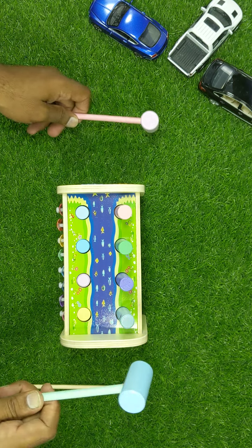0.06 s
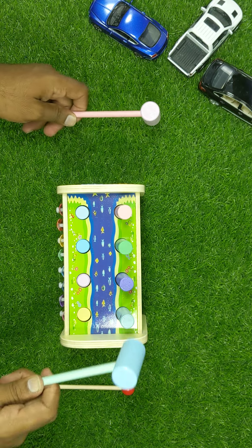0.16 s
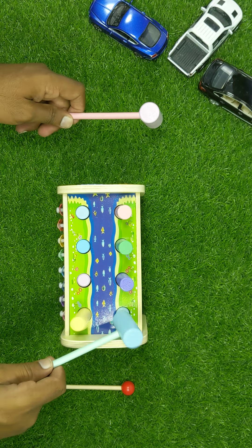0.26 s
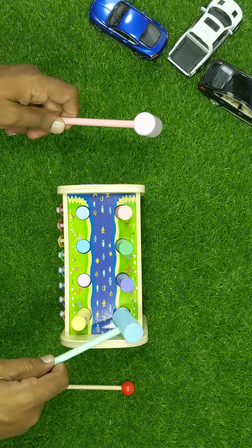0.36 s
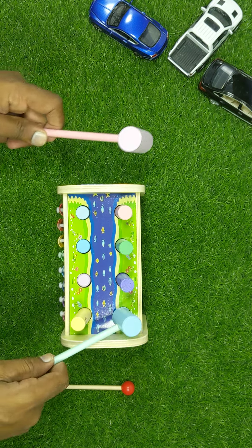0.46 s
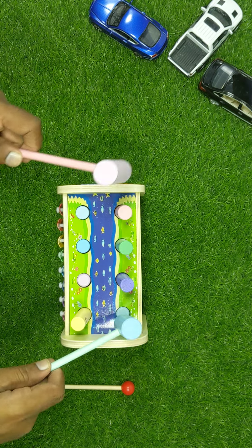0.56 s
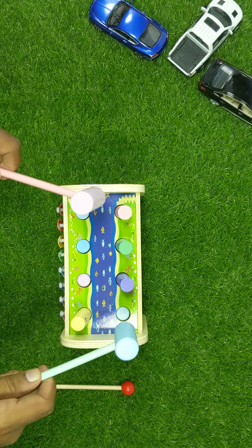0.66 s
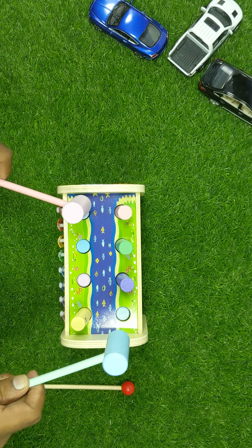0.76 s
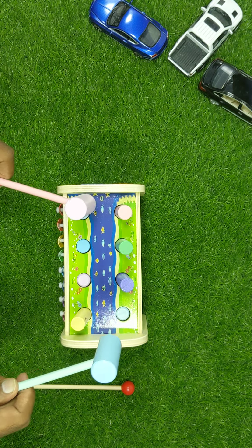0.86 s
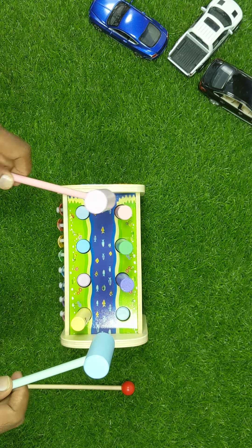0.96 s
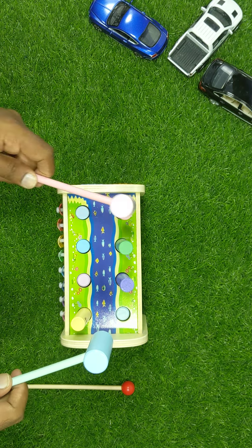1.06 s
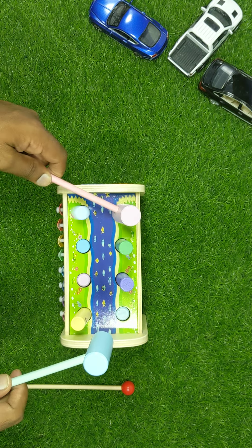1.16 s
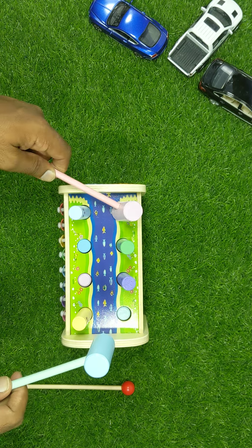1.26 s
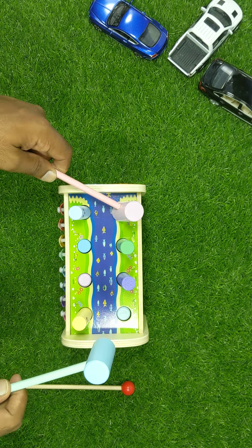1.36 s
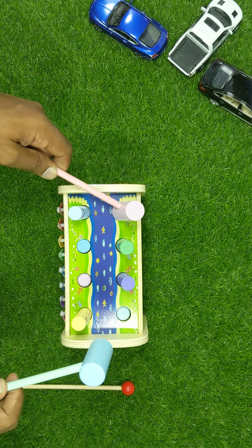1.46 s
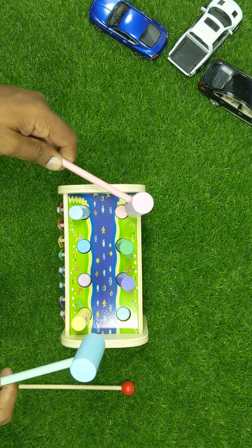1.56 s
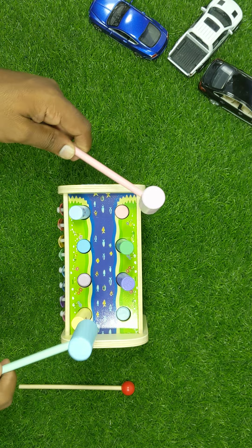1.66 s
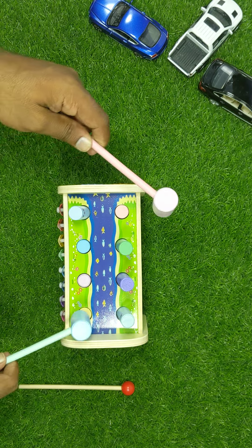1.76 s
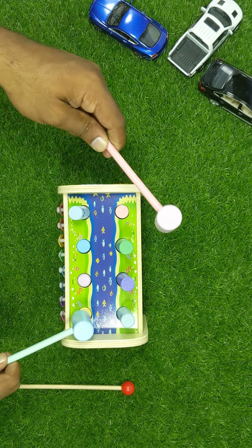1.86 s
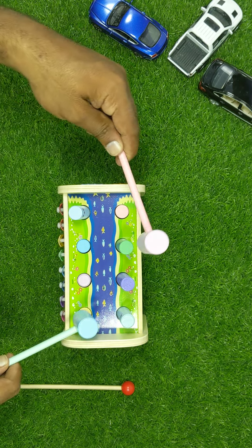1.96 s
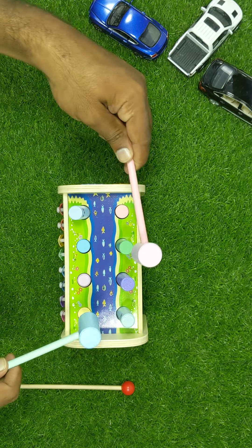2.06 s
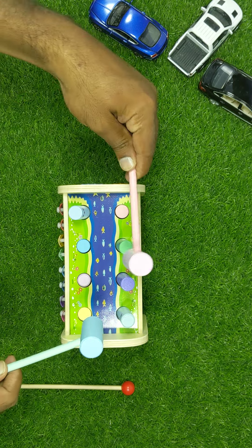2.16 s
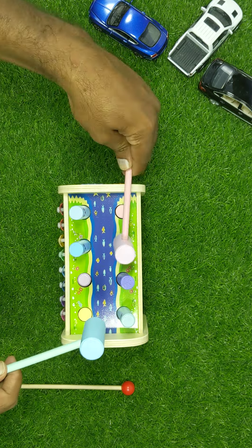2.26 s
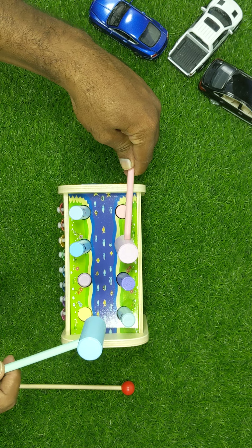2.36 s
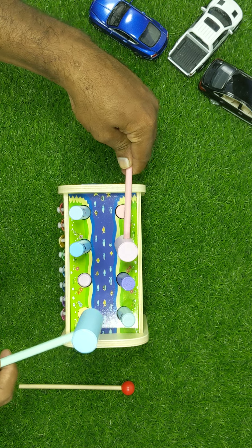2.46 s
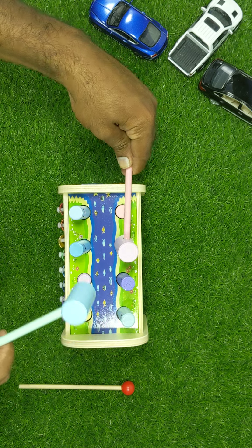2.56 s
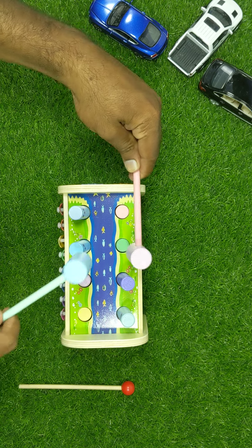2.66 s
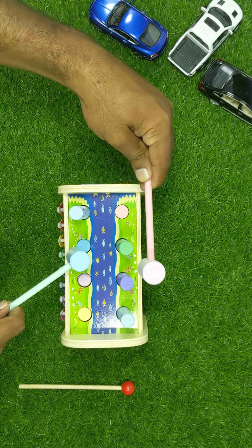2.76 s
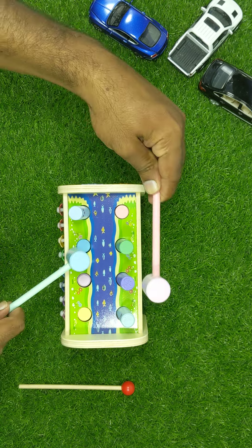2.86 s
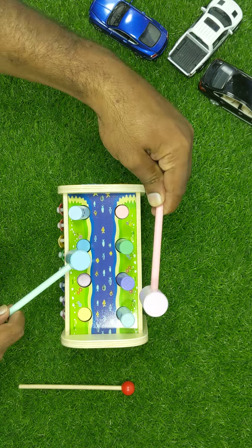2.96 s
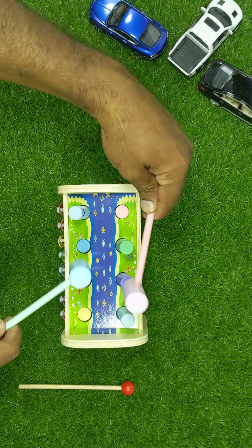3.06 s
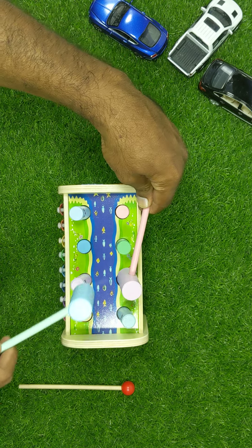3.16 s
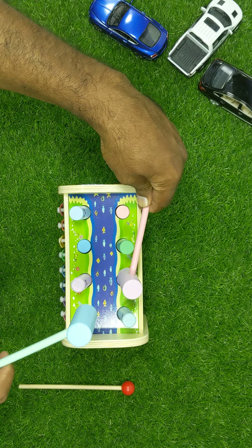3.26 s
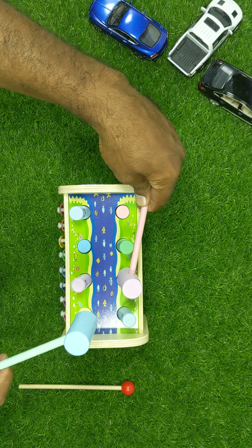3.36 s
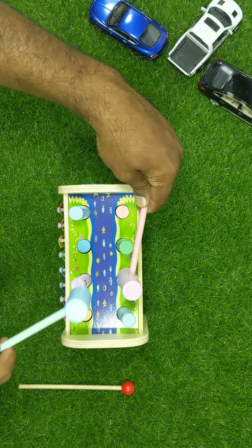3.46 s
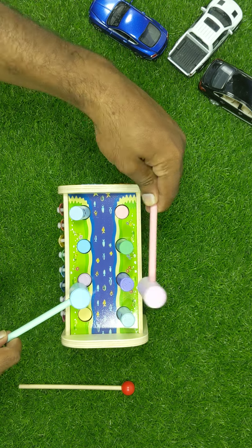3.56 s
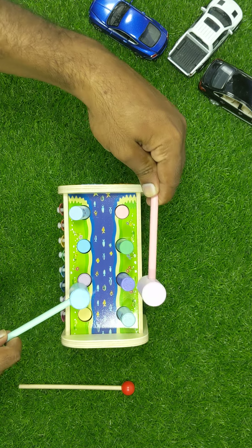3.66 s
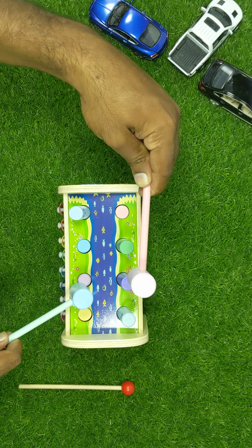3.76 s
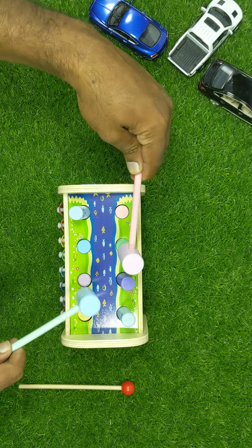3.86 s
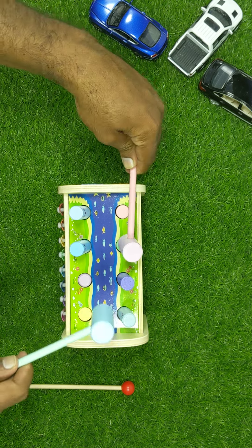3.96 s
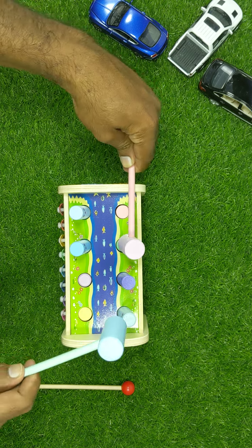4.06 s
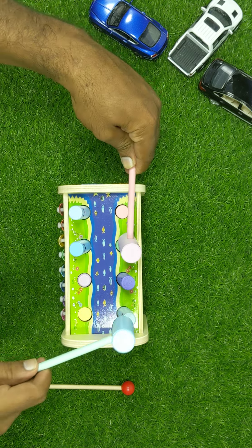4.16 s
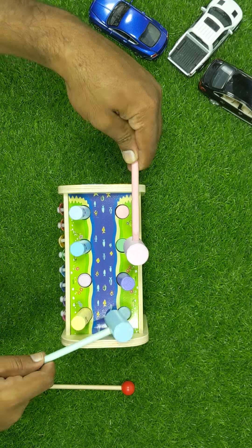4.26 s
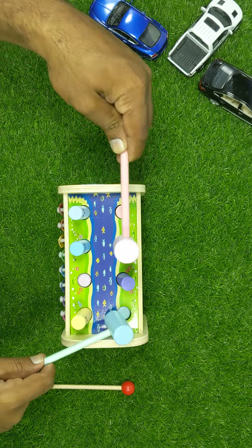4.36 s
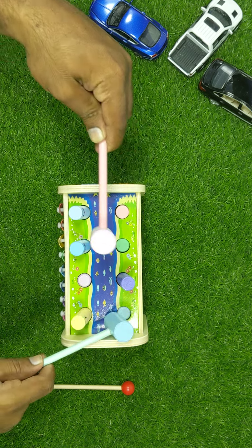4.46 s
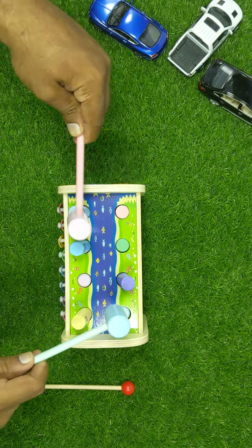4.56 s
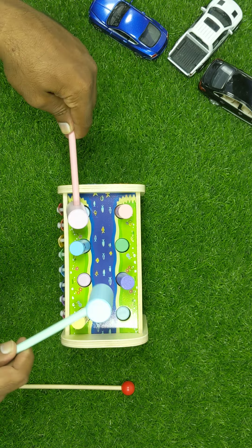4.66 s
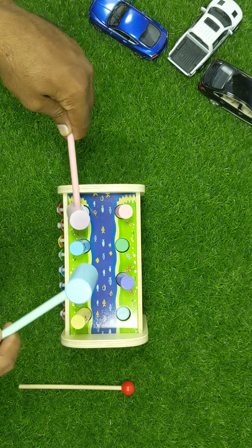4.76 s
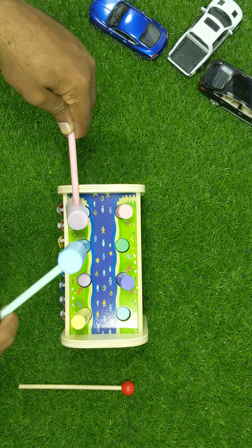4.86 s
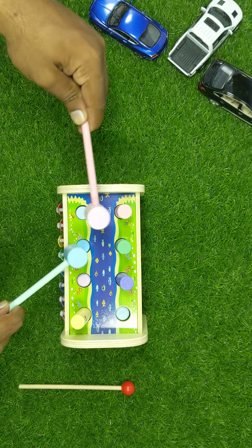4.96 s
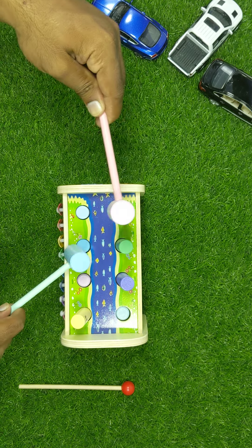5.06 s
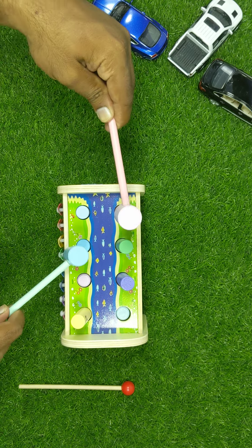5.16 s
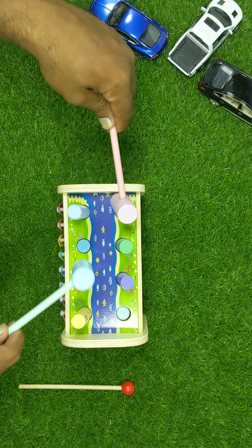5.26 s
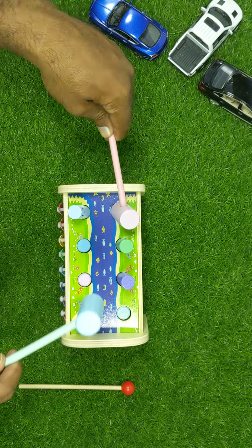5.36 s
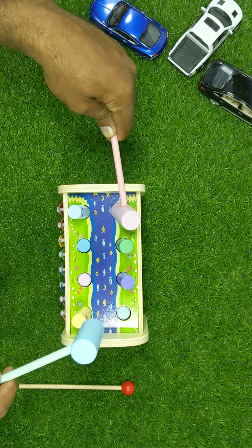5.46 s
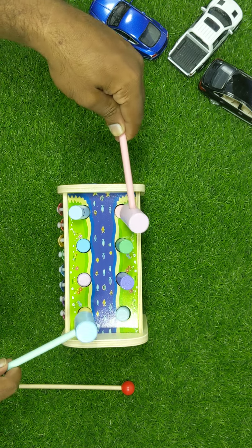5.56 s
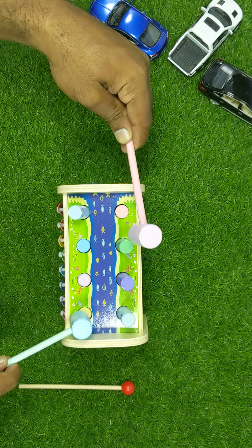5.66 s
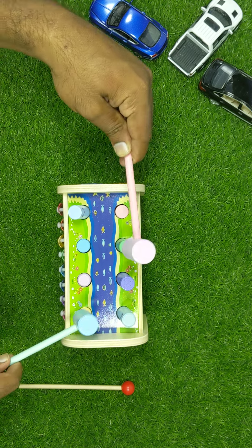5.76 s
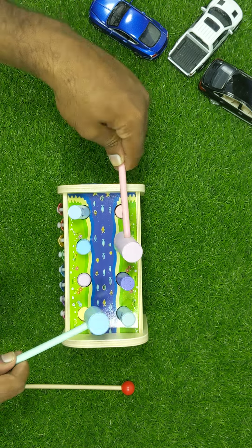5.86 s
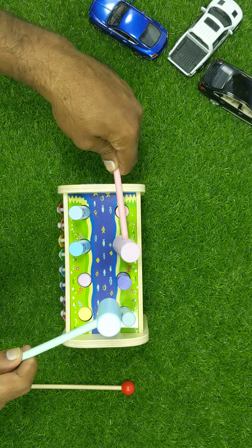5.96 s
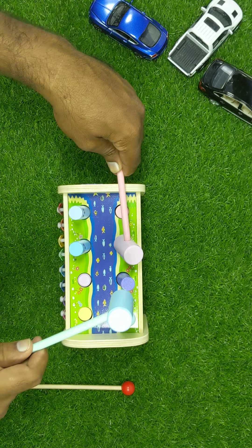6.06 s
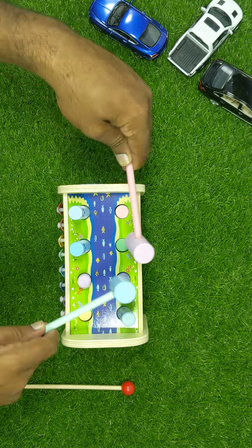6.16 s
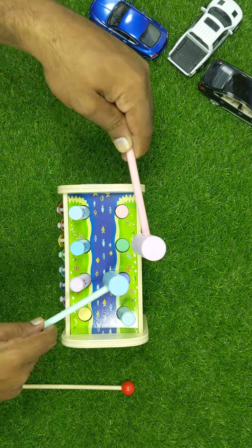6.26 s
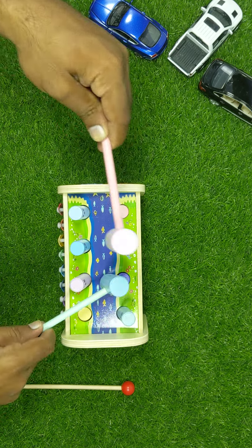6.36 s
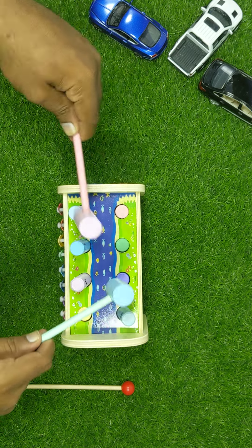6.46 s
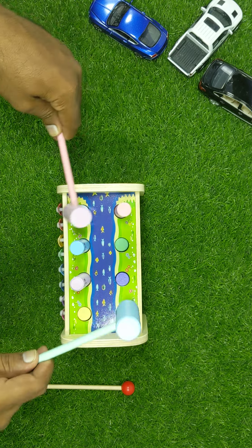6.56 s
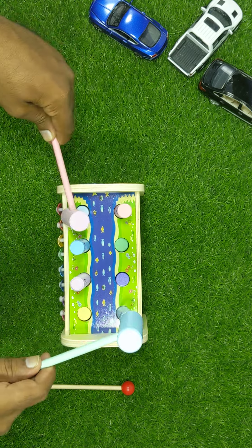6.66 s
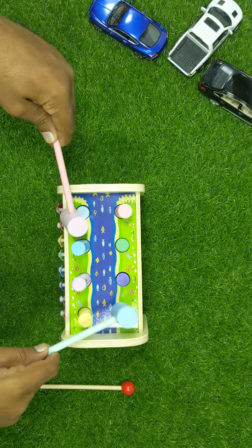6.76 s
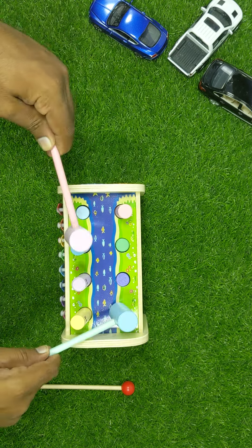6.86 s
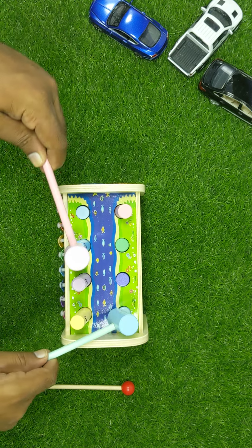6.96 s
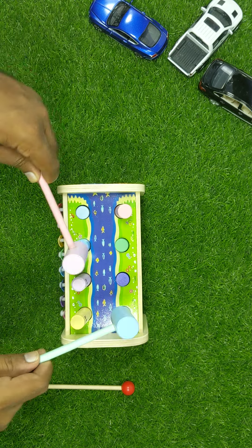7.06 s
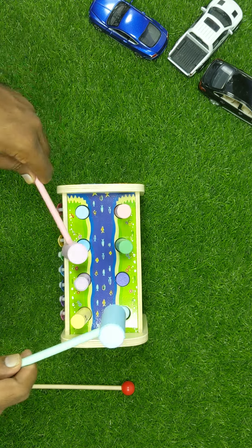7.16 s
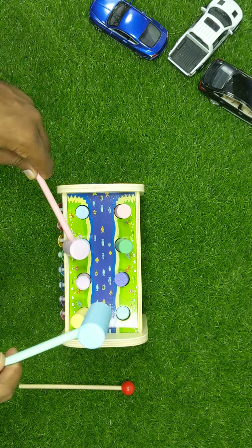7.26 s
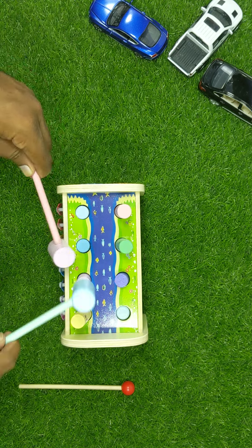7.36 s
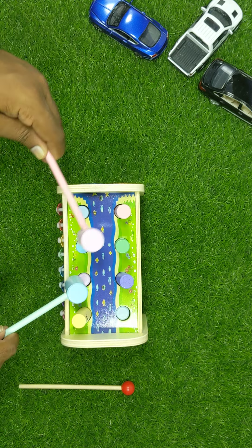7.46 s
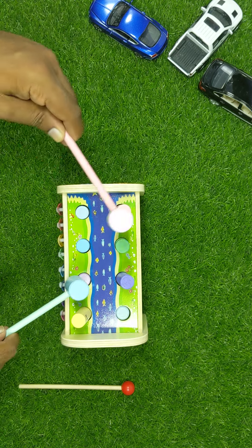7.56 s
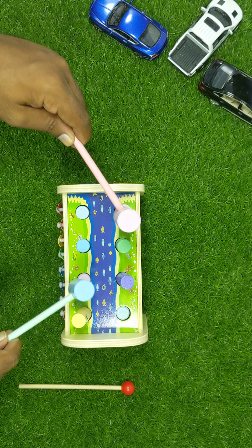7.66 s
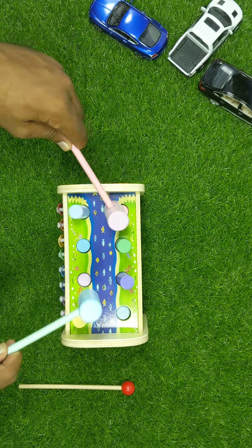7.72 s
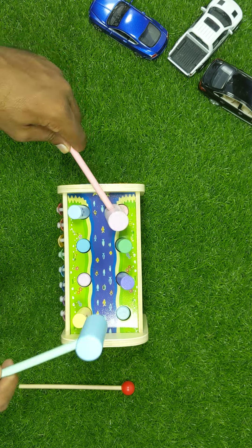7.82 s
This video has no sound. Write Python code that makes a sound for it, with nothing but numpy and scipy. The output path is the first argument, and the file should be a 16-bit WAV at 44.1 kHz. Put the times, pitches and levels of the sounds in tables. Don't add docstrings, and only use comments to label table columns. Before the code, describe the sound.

Close, sharp wood-on-wood tapping, roughly three hits a second, each crack answered by a hollow thunk, with light room reverb and low hum.

```python
import sys
import numpy as np
from scipy import signal
from scipy.fft import rfft, irfft
from scipy.io import wavfile

SR = 44100
rng = np.random.default_rng(int(sys.argv[2]) if len(sys.argv) > 2 else 0)


def unload_wav(signal):
    wavfile.write(
        sys.argv[1],
        SR,
        np.round(np.clip(np.atleast_2d(signal).T, -1, 1) * 32767).astype(np.int16),
    )


def boost_factor(decibels):
    exponent = np.asarray(decibels, float) / 20
    return 10 ** exponent


N = 347949

# start in seconds, crack in dB, mallet head in dB, peg's low and high note in Hz.
BLOWS = [(0.33, -12.5, -15.5, 3900, 9730), (1.2265, -18, -25, 3980, 7400), (1.7998, -16, -21.5, 5640, 7450),
         (2.3, -19, -23.5, 5910, 7540), (2.796, -23.5, -17, 4000, 7950), (3.166, -23, -23, 3830, 7000),
         (3.593, -15.5, -16.5, 3940, 8400), (3.956, -23.5, -22, 3900, 9550),
         (4.289, -14.5, -21, 4150, 7520), (4.672, -19.5, -23, 2950, 7500), (5.0036, -16, -16, 4070, 7340),
         (5.318, -19.5, -20.5, 5620, 7440), (5.6491, -15, -17.5, 5810, 9370), (5.923, -20, -18, 3660, 7300),
         (6.247, -11.5, -15.5, 4160, 9400), (6.566, -17, -16.5, 2980, 9480),
         (6.827, -12, -18.5, 4130, 9450), (7.15, -21, -17, 3990, 7700), (7.478, -13, -14.5, 5640, 9170),
         (7.778, -19.5, -20.5, 6230, 7100)]
# start in seconds, box in dB, mallet head in dB, body note in Hz, side panel in dB.
SEATS = [(0.375, -18, -22.5, 495, -33.5), (1.28, -19.5, -16.5, 392, -38.5), (1.843, -13, -19, 469, -35),
         (2.346, -18, -28.5, 476, -43), (2.84, -6, -9.5, 465, -23.5), (3.21, -5.5, -15.5, 576, -37),
         (3.642, -5.5, -10, 497.7, -24.5), (4.006, -7, -14.5, 499, -22.5), (4.34, -22, -26, 450, -42.5),
         (4.721, -14, -23, 384, -45.5), (5.043, -11.5, -9.5, 570, -33), (5.363, -17.5, -20, 331, -38),
         (5.688, -12.5, -21, 471, -26.5), (5.974, -8, -19.5, 480, -30), (6.281, -7, -13.5, 502.4, -27),
         (6.62, -16, -16.5, 386, -34), (6.871, -20, -18, 436, -32.5), (7.191, -12, -12, 497, -34),
         (7.504, -9.5, -14.5, 485.4, -47), (7.821, -8, -15.5, 474, -52)]


def evened(x):
    return x / np.sqrt(np.mean(x ** 2) + 1e-20)


def read(points, hz):
    f, value = np.transpose(points)
    return np.interp(np.log(hz + 1), np.log(f + 1), value)


def add(mix, s, sound):
    part = mix[:, round(s * SR):][:, :sound.shape[1]]
    part += sound[:, :part.shape[1]]


def rings(t, hz, db, t60):
    size = (-1) ** np.arange(len(hz)) * boost_factor(db)
    return size @ (boost_factor(-60 * t / t60[:, None]) * np.sin(2 * np.pi * hz[:, None] * t))


def causal(db):
    log_gain = np.log(boost_factor(np.maximum(np.r_[db, db[-2:0:-1]], -140)))
    return np.fft.ifft(np.exp(log_gain - 1j * signal.hilbert(log_gain).imag)).real


def dying_noise(noise, t60s):
    hz, t = np.fft.rfftfreq(noise.shape[1], 1 / SR), np.arange(noise.shape[1]) / SR
    centres = np.array([f for f, _ in t60s])
    out = 0
    for row, (_, t60) in zip(np.eye(len(centres)), t60s):
        share = np.interp(np.log(hz + 1), np.log(centres), row)
        out = out + irfft(rfft(noise) * share, len(t)) * boost_factor(-60 * t / t60)
    return out / np.linalg.norm(out[0])


def hum():
    # frequency in Hz, level in dB per Hz.
    hum_spectrum = [(12, -35), (20, -23), (32, -13.5), (44, -6), (58, 0), (68, -30), (86, -7), (102, -0.5),
                    (130, -32), (248, -30), (310, -26.5), (1150, -40), (6910, -49.5), (9400, -51.5),
                    (16000, -58)]
    # frequency in Hz, likeness of left and right from -1 to 1.
    likeness = [(60, 1), (180, 0.97), (550, 0.13), (1650, -0.55), (4970, 0.69), (15000, -0.1)]
    frames, hz = N // 1024 + 5, np.fft.rfftfreq(4096, 1 / SR)
    a, b, c, d = rng.standard_normal((frames, 2049, 4)).T
    same = np.clip(read(likeness, hz), -1, 1)[:, None]
    left = a + 1j * b
    right = same * left + np.sqrt(1 - same ** 2) * (c + 1j * d)
    spectra = np.array([left, right]) * boost_factor(read(hum_spectrum, hz))[:, None]
    noise = signal.istft(spectra, nperseg=4096, noverlap=3072)[1][:, :N]
    return boost_factor(-50) * evened(noise)


def rustle():
    out, t = np.zeros((2, N)), np.arange(8192) / SR
    band = signal.butter(2, [2200, 9000], "band", fs=SR, output="sos")
    noise = signal.sosfilt(band, rng.standard_normal((2, len(t))))
    add(out, 0, boost_factor(-63) * evened(noise) * np.sqrt(np.clip(1 - t / 0.09, 0, 1)))
    return out


def room(x, start_s, alike):
    # frequency in Hz, t60 in seconds.
    room_t60 = [(150, 1.0), (400, 0.77), (1040, 0.67), (2760, 0.51), (7280, 0.38)]
    taps = np.zeros((2, SR))
    at = np.arange(0, SR - 10, 10) + rng.integers(0, 10, (2, SR // 10 - 1))
    np.put_along_axis(taps, at, rng.choice([-1., 1.], at.shape), 1)
    taps[1] = alike * taps[0] + np.sqrt(1 - min(alike, 1) ** 2) * taps[1]
    tail = dying_noise(taps, room_t60) * np.clip(np.arange(SR) / SR / start_s, 0, 1) ** 2
    return signal.fftconvolve(x, tail, axes=1)[:, :N]


def ports(x):
    # frequency in Hz, lead of the left port in radians.
    lead = [(100, 0.43), (500, 0.74), (2000, 1.02), (6000, 1.73), (15000, 1.3)]
    # frequency in Hz, left over right in dB.
    shade = [(250, -1), (500, 0), (1000, 1), (4000, -1.1), (9000, -1.5), (15000, -4)]
    hz = np.fft.rfftfreq(N, 1 / SR)
    left, right = rfft(x)
    apart = 1 / (1 + (420 / (hz + 1)) ** 2)
    mid, side = (left + right) / 2, apart * (left - right) / 2
    turn = np.exp(.5j * read(lead, hz)) * boost_factor(read(shade, hz) / 2)
    return irfft(np.array([(mid + side) * turn, (mid - side) / turn]), N)


def table():
    pushes = [-31.5, -42.5, -33.5, -29.5, -35.5, -34, -29, -32.5, -26, -32, -31, -36, -30, -28.5, -26, -26,
              -26.5, -27, -29.5, -38]
    # mode in Hz, level in dB, t60 in seconds.
    table_modes = [(38, -2.5, .3), (58.8, -13, 1), (60.5, 0, 0.94), (79.5, -11, .4), (122.1, -9, 1),
                   (156, -15.5, 0.57)]
    out, t = np.zeros((2, N)), np.arange(SR) / SR
    hz, db, t60 = np.transpose(table_modes)
    swell = (1 - np.exp(-(t / 0.018) ** 2)) * (1 - t)
    for (s, *_), boom_db in zip(BLOWS, pushes):
        boom = rings(t, hz, boom_db + db + 1.1 * rng.standard_normal(len(hz)), t60)
        add(out, s + 0.007, boom[None] * swell)
        jolt = boost_factor(boom_db - 2.5 - 60 * t / 0.15) * np.sin(2 * np.pi * 40 * t)
        add(out, s, jolt[None])
    return out


def touches():
    # start in seconds, level in dB, pitch in Hz, t60 in seconds.
    brushes = [
        (.297, -51, 7500, 0.0067),
        (2.150, -57, 582, 0.025),
        (2.592, -49, 600, 0.021),
        (2.672, -48, 600, .03),
        (3.518, -48, 604, 0.036),
    ]
    out, t = np.zeros((2, N)), np.arange(4096) / SR
    for s, db, hz, t60 in brushes:
        add(out, s, boost_factor(db - 60 * t / t60) * np.sin(2 * np.pi * hz * t)[None])
    return out


def bar():
    # start in seconds, level in dB.
    shivers = [
        (1.28, -61),
        (2.346, -59.5),
        (5.042, -69),
        (6.87, -79),
    ]
    out, t = np.zeros((2, N)), np.arange(SR // 2) / SR
    bar_hz, bar_t60 = 2245, 2.2
    for s, db in shivers:
        add(out, s, boost_factor(db - 60 * t / bar_t60) * np.sin(2 * np.pi * bar_hz * t)[None] * np.sqrt(1 - 2 * t))
    return out


def knocks(rows, column_hz, peaks, crack, ring_db, crack_db, box_db, scatter_db, detune, alike, slower, rise_s,
           direct, far_db, clear_db):
    # mode in Hz, level in dB, t60 in seconds.
    box_modes = [(337, -10.5, 0.14), (341, -16.5, 0.84), (420, -14.5, 0.2), (475, -4, 0.2),
                 (576.7, 0.5, 0.16), (643.5, -2, 0.2), (1096, -19.5, 0.21), (1201, -11, 0.31),
                 (1136, -22, 0.11), (1210, -16, 0.1)]
    # frequency in Hz, t60 in seconds.
    scatter_t60 = [(200, 0.092), (800, 0.064), (3000, 0.061), (12000, 0.068)]
    rows, near, sent = np.array(rows), np.zeros((2, N)), np.zeros((1, N))
    t, bins = np.arange(8192) / SR, np.fft.rfftfreq(4096, 1 / SR)
    peak_hz, width, peak_db = np.transpose(peaks)
    box_hz, box_mode_db, box_t60 = np.transpose(box_modes)
    for s, *parts_db in rows:
        colour = list(zip(column_hz, parts_db - rows[:, 1:5].mean(0)))
        hz = peak_hz * (1 + detune * rng.standard_normal(len(peak_hz)))
        db = ring_db + peak_db + read(colour, hz) + rng.uniform(-4, 4, len(hz))
        ring = rings(t, hz, db, slower * 1.65 / np.maximum(width, 60))

        shifted_hz = box_hz * (1 + 0.03 * rng.standard_normal(len(box_hz)))
        db = box_db + box_mode_db + read(colour, box_hz) + 2 * rng.standard_normal(len(box_hz))
        knock = rings(t, shifted_hz, db, box_t60)
        knock[:2048] += causal(crack_db + read(crack, bins) + read(colour, bins))[:2048]

        a, b = rng.standard_normal((2, 4096))
        scatter = np.array([a, alike * a + np.sqrt(1 - min(alike, 1) ** 2) * b])
        paths = boost_factor(scatter_db) * dying_noise(scatter, scatter_t60)
        paths *= 1 - np.exp(-(t[:4096] / rise_s) ** 2)
        paths[:, 0] += direct
        heard = signal.fftconvolve((knock + ring)[None], paths, axes=1)
        heard[:, :len(t)] += boost_factor(clear_db) * ring * (1 - np.exp(-t / rise_s))
        add(near, s, heard)
        add(sent, s, (knock + boost_factor(far_db) * ring)[None])
    return near, sent


def seat_notes():
    # mode in Hz, level in dB, t60 in seconds.
    panel_modes = [(1079, -4, 0.41), (1116, -1.5, 0.69)]
    out, t = np.zeros((1, N)), np.arange(SR // 2) / SR
    panel = rings(t, *np.transpose(panel_modes))
    shape = (1 - np.exp(-t / 0.0021)) * (1 - 2 * t)
    t60 = np.array([0.079, 0.023, 0.079])
    for s, box_db, head_db, hz, panel_db in SEATS:
        note_hz = np.array([hz, 2122, hz * 1.07])
        note_db = np.array([box_db - 5, head_db - 10.5, box_db - 5 - 4])
        note = rings(t, note_hz, note_db, t60)
        add(out, s, (note + boost_factor(panel_db) * panel)[None] * shape)
    return out


def stop_rows():
    # start in seconds, box in dB, mallet head in dB, crack in dB.
    bounces = [
        (0.365, -16, -21.5, -20),
        (2.894, -15.5, -31, -32.5),
        (3.267, -17, -35.5, -31),
        (3.424, -33.5, -50.5, -55),
        (3.58, -21, -37.5, -47.5),
        (4.833, -41, -56.5, -51),
        (5.95, -26.5, -20.5, -35),
        (6.666, -17, -38.5, -33),
        (7.24, -16, -43.5, -31),
    ]
    rows = []
    for s, box_db, head_db, _, _ in SEATS:
        rows.append((s, box_db, box_db - 10.5, head_db, (box_db + head_db) / 2 - 6))
    for s, box_db, head_db, crack_db in bounces:
        rows.append((s, box_db, box_db - 15.5, head_db, crack_db))
    return sorted(rows)


def stops():
    stop_hz = [500, 1100, 2150, 4500]
    # frequency in Hz, width in Hz, level in dB.
    bench_modes = [(525.6, 113, 14.5), (775, 7.6, -6.5), (1200, 180, 4.5), (1400, 8.7, -9.5), (2156, 16, 7),
                   (2600, 5, -25.5), (2980, 27, -16.5), (3240, 43, -7), (3240, 13, -8), (3900, 10, -9),
                   (5840, 51, -9), (7520, 100, -33.5), (8900, 54, -34.5), (12200, 130, -28)]
    # frequency in Hz, level in dB per Hz.
    bench_crack = [(59, -55), (100, -22.5), (476, 1.5), (1170, -8), (1750, -19), (2120, -17), (2360, -4),
                   (3860, -10), (4990, -13.5), (13900, -33.5), (16500, -45.5)]
    near, sent = knocks(stop_rows(), stop_hz, bench_modes, bench_crack, ring_db=-28.5, crack_db=13.0,
                        box_db=-34.5, scatter_db=7.0, detune=0.021, alike=0.38, slower=0.63, rise_s=0.00089,
                        direct=0.092, far_db=-4.0, clear_db=9.5)
    notes = seat_notes()
    return near + notes, sent + boost_factor(-5.5) * notes


def blow_rows():
    boxed = [-17, -25.5, -23.5, -22, -20.5, -25.5, -20, -24, -20, -20.5, -23.5, -19.5, -24.5, -23, -19, -22,
             -18.5, -24.5, -22.5, -25]
    s, crack_db, head_db = np.transpose(BLOWS)[:3]
    edge_db = -19.5 + 1.3 * (crack_db - crack_db.mean())
    return np.transpose([s, boxed, head_db, crack_db, edge_db])


def peg_notes():
    # start in seconds, level in dB, pitch in Hz.
    landings = [
        (2.8419, -2, 3460),
        (3.212, 3, 3950),
        (3.6416, -13, 2960),
        (3.6416, 2, 5770),
        (6.2811, -13, 4400),
        (6.624, -1, 3300),
        (7.8204, 5.5, 3240),
    ]
    out, t = np.zeros((1, N)), np.arange(4096) / SR
    rise = 1 - np.exp(-t / 0.0011)
    rows = blow_rows()
    for (s, _, _, crack_db, edge_db), (*_, low_hz, high_hz) in zip(rows, BLOWS):
        low_db = -21.5 + 0.6 * (crack_db - rows[:, 3].mean())
        note = rings(t, np.array([low_hz, high_hz]), np.array([low_db, edge_db - 3]), np.array([0.057, 0.057]))
        add(out, s, note[None] * rise)
    for s, db, hz in landings:
        note = rings(t, np.array([hz]), np.array([db - 5.5]), np.array([0.018]))
        add(out, s, note[None] * rise)
    return out


def blows():
    blow_hz = [500, 2150, 4500, 9000]
    # frequency in Hz, width in Hz, level in dB.
    peg_modes = [(662, 250, -14), (1270, 75, -16), (2147, 100, 11.5), (2495, 31, 5), (2960, 53, -11),
                 (3070, 69, -2.5), (4130, 200, 11), (5310, 95, 9), (5830, 110, 0), (7520, 138, 15.5),
                 (8110, 120, -27.5), (9540, 110, 11.5), (9600, 110, -14), (12900, 33, -2.5),
                 (14200, 230, -18.5), (14280, 150, -22.5)]
    # frequency in Hz, level in dB per Hz.
    peg_crack = [(59, -43.5), (100, 1.5), (507, 2.5), (1610, 1.5), (2120, -12.5), (2800, 1.5), (5670, 3),
                 (8150, -4), (9880, -4.5), (15100, -18), (16500, -42)]
    near, sent = knocks(blow_rows(), blow_hz, peg_modes, peg_crack, ring_db=-28, crack_db=10, box_db=-49,
                        scatter_db=4.5, detune=0.024, alike=0.86, slower=0.77, rise_s=0.00044, direct=0.25,
                        far_db=-1.0, clear_db=5.5)
    pegs = peg_notes()
    return near + pegs, sent + boost_factor(-5.0) * pegs


def scene():
    blows_near, blows_out = blows()
    stops_near, stops_out = stops()
    wood = blows_near + stops_near
    wood += boost_factor(-0.5) * room(blows_out, 0.026, alike=0.51)
    wood += boost_factor(1) * room(stops_out, 0.0053, alike=0.27)
    wood = signal.sosfilt(signal.butter(4, 255, "high", fs=SR, output="sos"), wood)
    return ports(wood) + touches() + bar() + table() + hum() + rustle()


def low_pass(x):
    return signal.sosfilt(signal.butter(12, 17010, fs=SR, output="sos"), x)


def record(dry):
    ceiling = 0.8
    rounded = ceiling * np.tanh(dry / ceiling)
    limited = signal.oaconvolve(rounded, signal.firwin(101, 16300, fs=SR)[None], "same")
    return low_pass(limited)


dry = scene()
out = record(dry)
unload_wav(out)
```